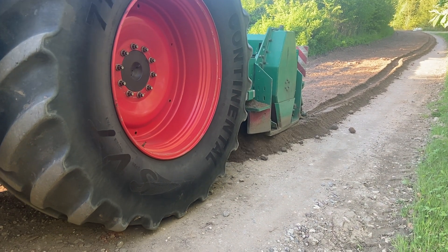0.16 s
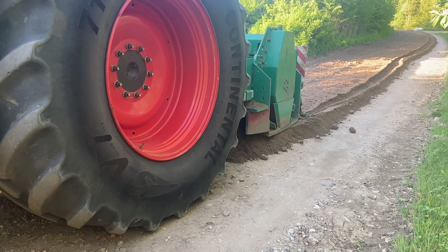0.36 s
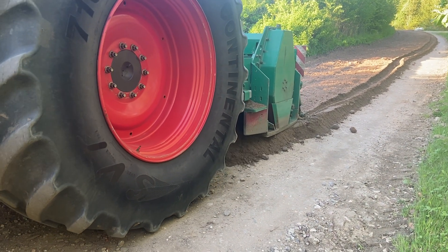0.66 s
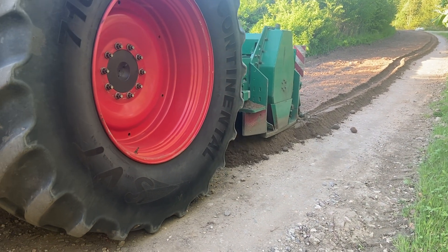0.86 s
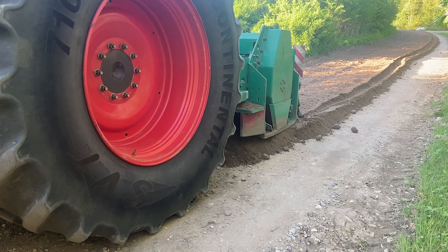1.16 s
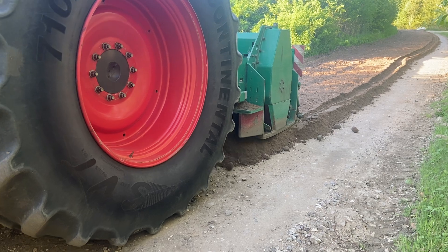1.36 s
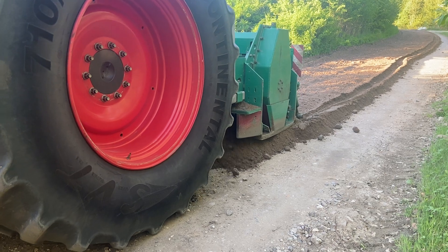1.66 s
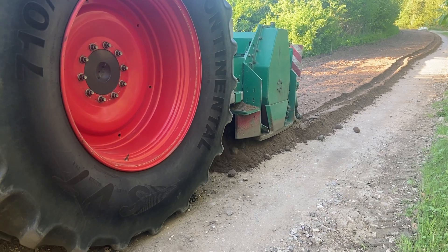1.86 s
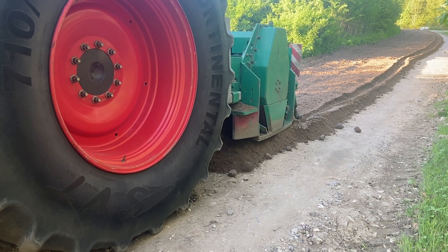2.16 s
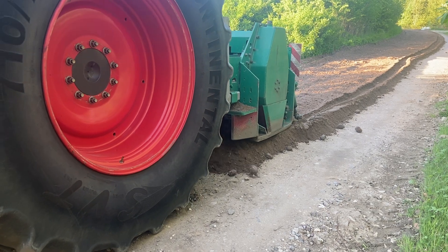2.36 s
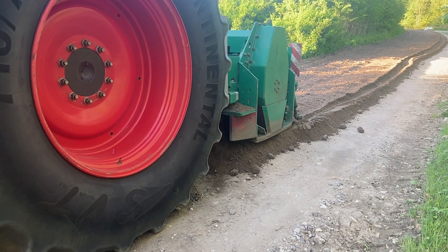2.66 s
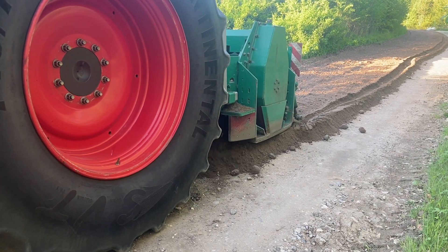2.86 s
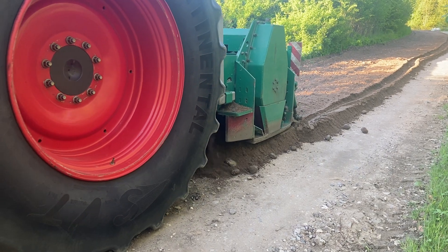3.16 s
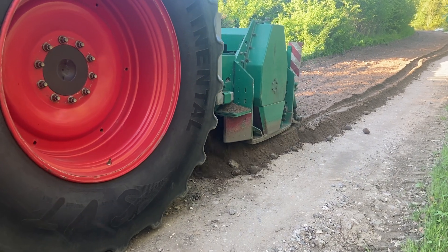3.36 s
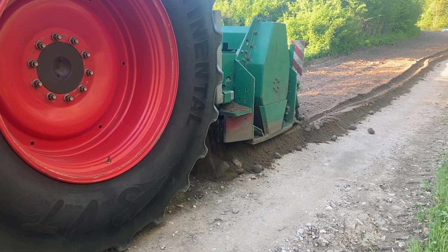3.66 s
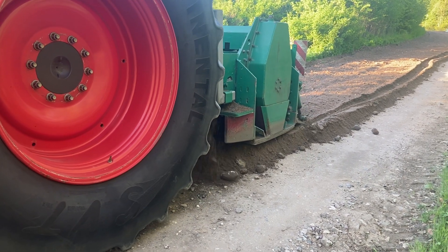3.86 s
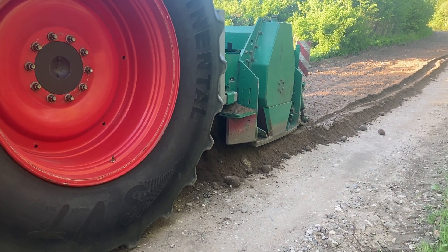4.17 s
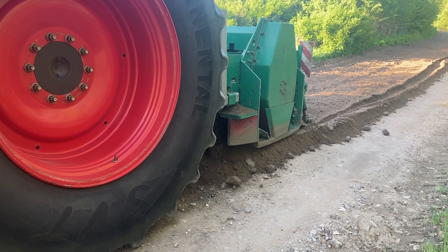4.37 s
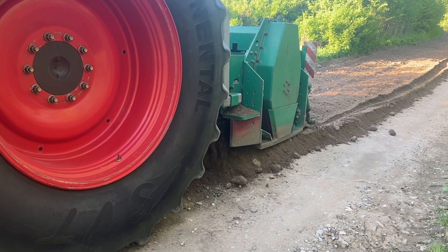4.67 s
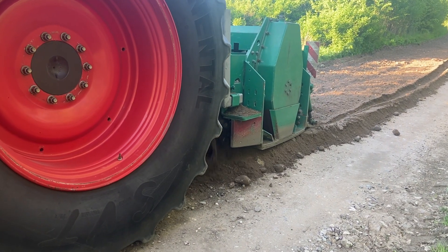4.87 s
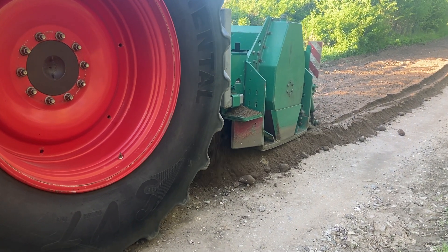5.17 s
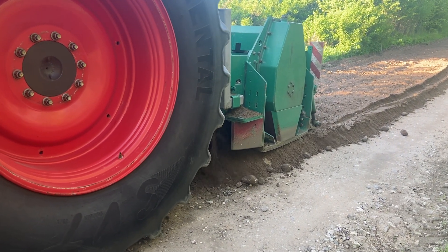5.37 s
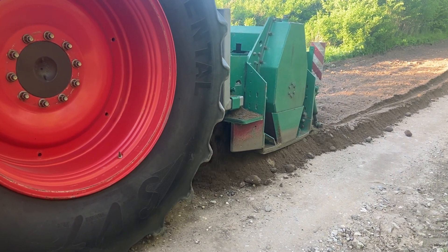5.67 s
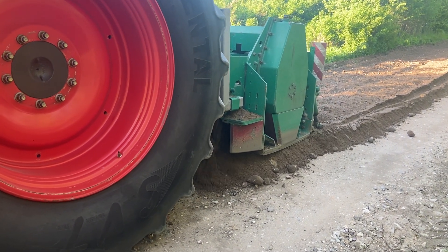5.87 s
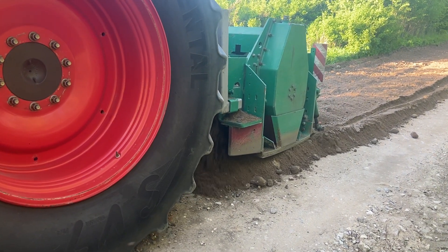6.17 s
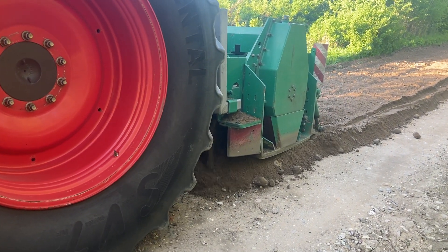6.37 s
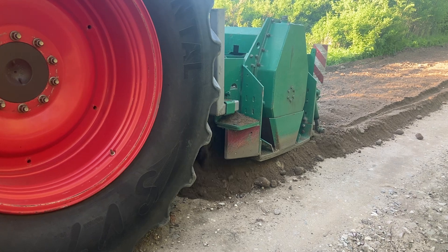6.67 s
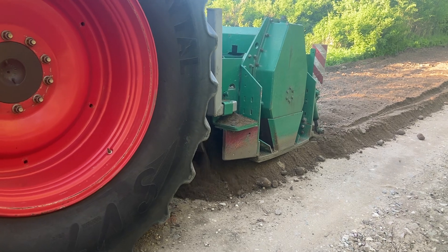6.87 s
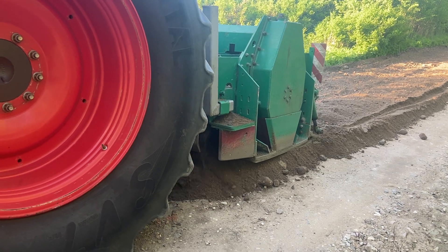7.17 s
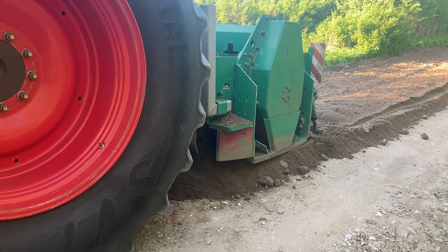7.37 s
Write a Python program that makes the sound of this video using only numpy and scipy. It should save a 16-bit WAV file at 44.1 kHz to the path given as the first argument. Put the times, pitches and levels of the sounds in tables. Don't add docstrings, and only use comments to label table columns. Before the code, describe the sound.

Continuous gritty roar of a rotor crushing gravel, throbbing slightly with a loaded diesel engine. Steady mid-pitched gear whines and faint high whistles sit within it. Stones knock and crack on steel panels at uneven intervals, some in quick pairs, and heavy rocks jolt the frame with low thuds. Light wind rumbles on the microphone, close by in the open air, and the machine never stops.

```python
import sys
import numpy as np
from scipy import signal
from scipy.fft import rfft, irfft, next_fast_len
from scipy.io import wavfile

SR = 44100
rng = np.random.default_rng(int(sys.argv[2]) if len(sys.argv) > 2 else 0)


def to_linear_factor(level_db):
    exponent = np.asarray(level_db, float) / 20
    return 10 ** exponent


def unload_audio(sound):
    columns = np.transpose(np.atleast_2d(sound))
    steps = np.round(np.clip(columns, -1, 1) * 32767)
    wavfile.write(sys.argv[1], SR, steps.astype(np.int16))


N = 331191
TIME_S = np.arange(N) / SR


def rms_one(x):
    return x / np.sqrt(np.mean(x ** 2) + 1e-20)


def in_time(rows):
    s, *columns = np.transpose(rows)
    return [np.interp(TIME_S, s, column) for column in columns]


def drift(rate_hz):
    r = np.exp(-80 * np.pi * rate_hz / SR)
    white = rng.standard_normal(N // 40 + 2002)
    slow = signal.lfilter([1], [1, -2 * r, r * r], white)[2000:]
    return np.interp(np.arange(N) / 40, np.arange(len(slow)), rms_one(slow))


def band(x, low_hz, high_hz):
    return signal.sosfilt(signal.butter(2, [low_hz, high_hz], "band", fs=SR, output="sos"), x)


def whine(hz, db, width_hz, flutter_db, per_s=14):
    turns = np.cumsum(hz + width_hz * drift(9.57)) / SR + rng.random()
    level = np.sqrt(2) * to_linear_factor(db + flutter_db * drift(per_s))
    return level * np.sin(2 * np.pi * turns)


# peak time in seconds, level in dB.
GUSTS = [(.02, -22), (.54, -32), (1.63, -39), (2.2, -37), (2.61, -33), (3.01, -35), (3.2, -24), (3.47, -29),
         (3.8, -34), (4.16, -23), (4.37, -20), (4.64, -23), (4.81, -28), (5.04, -27), (5.54, -22),
         (5.96, -25), (6.42, -31), (6.61, -34), (6.88, -35), (7.45, -32)]


def wind():
    rise_db_per_s, fall_db_per_s, lull_db = 110, 170, -44
    db = np.full(N, float(lull_db))
    for s, top_db in GUSTS:
        below_db = np.where(TIME_S < s, rise_db_per_s * (s - TIME_S), fall_db_per_s * (TIME_S - s))
        db = np.maximum(db, top_db - below_db)
    rumble = band(band(rng.standard_normal((2, N)), 41, 64), 32, 74)
    return to_linear_factor(db - 3.0) * rms_one(rumble)


# start in seconds, level in dB.
JOLTS = [
    (1.7, -20),
    (2.15, -29),
    (2.95, -27),
    (4.13, -21.5),
    (4.279, -22),
    (4.54, -26),
    (5.6, -24),
    (6.78, -33),
]


def jolts():
    rise_s, t60_s = 0.025, 0.61
    rows = np.array(JOLTS)
    since = np.maximum(TIME_S - rows[:, :1], 0)
    shape = to_linear_factor(rows[:, 1:] - 60 * since / t60_s) * (1 - np.exp(-since / rise_s))
    return 2 * shape.sum(axis=0) * rms_one(band(rng.standard_normal((2, N)), 60, 215))


# pitch in Hz, level in dB.
STEADY_WHINES = [(107, -36), (121.6, -34), (228.6, -45), (322.3, -44), (809, -35.5), (852, -40.5),
                 (931, -42), (2834, -49.5)]
# pitch in Hz, level in dB, start in seconds, end in seconds.
PASSING_WHINES = [(202.2, -37.5, 0.5, 6.46), (257.3, -31, -1, 2.47), (424, -30.5, 3.5, 8),
                  (514.4, -33, 1.9, 7), (1049, -32.5, 1, 2.8), (1223, -38, 6, 8), (1950, -48, 6.5, 8),
                  (2192, -37, 4.6, 6.1)]


def shafts():
    fade_s = 0.3
    always = [(hz, db, -1, 9) for hz, db in STEADY_WHINES]
    out = np.zeros(N)
    for hz, db, start, end in always + PASSING_WHINES:
        fade_in = np.clip((TIME_S - start + fade_s) / fade_s, 0, 1)
        fade_out = np.clip((end - TIME_S) / fade_s, 0, 1)
        wobble_hz = 1.49 + 0.00202 * hz
        out += fade_in * fade_out * whine(hz, db + 1.5 * drift(1.5), wobble_hz, flutter_db=3.0)
    return out


# time in seconds, pitch of meshing gear teeth in Hz,
# strain on the gears in dB, closeness of the crusher in dB.
DRIVE = [(0, 282.8, 0, 2), (1, 282.2, 2, -1.5), (1.6, 283, -5, -1.5), (2.1, 285.3, -2.5, -1),
         (3, 284, -2.5, 1), (3.9, 282.7, -2, -2), (4.3, 281.1, 1, -1), (4.8, 279.8, 6, 2.5),
         (5.3, 281, 3.5, -0.5), (5.8, 282.2, 1, 3.5), (6.2, 283.4, 0, 6), (6.7, 283.3, 2.5, 3.5),
         (7.51, 281.7, 4, 6.5)]
# level in dB, share of the strain (a factor), share of the closeness (a factor).
TONES = [
    (-30, -0.54, 1.3),
    (-32.5, 0.76, 0.98),
    (-34.5, 1.2, 0.04),
    (-32.5, .4, -.4),
    (-29, 0.12, .6),
    (-33, .4, 0.75),
]
# time in seconds, pitch in Hz, level in dB.
TURBO = [(.15, 8150, -47), (1.2, 8000, -43), (1.5, 8000, -50), (1.7, 7970, -43), (2.1, 8050, -47),
         (2.5, 8000, -40), (3, 7840, -42), (3.35, 7850, -43), (3.65, 7760, -44), (4.2, 7640, -49),
         (4.7, 7850, -54), (5.2, 7920, -37.5), (5.75, 7980, -48), (6.1, 7920, -44), (6.4, 7826, -46),
         (6.6, 7800, -54), (7.51, 7830, -50)]
FIRING_RATIO, PUMP_RATIO = .2858, .4936


def drivetrain():
    mesh_hz, strain, close = in_time(DRIVE)
    *mesh_dbs, firing_db, pump_db = [db + a * strain + b * close for db, a, b in TONES]
    out = np.zeros(N)
    for k, db in zip((1, 2, 4, 6), mesh_dbs):
        out += whine(k * mesh_hz, db, .4 * k, flutter_db=3.0, per_s=16)
    out += whine(FIRING_RATIO * mesh_hz, firing_db, .8, flutter_db=1.5)
    out += whine(PUMP_RATIO * mesh_hz, pump_db, 1.2, flutter_db=2.2)
    injector_hz = 7289 * mesh_hz / np.mean(mesh_hz)
    out += whine(injector_hz, -52 + 2.5 * drift(1.5), 6.0, flutter_db=3.0, per_s=25)
    turbo_hz, turbo_db = in_time(TURBO)
    return out + whine(turbo_hz, turbo_db, 5.2, flutter_db=3.0, per_s=23)


# time in seconds, bite in dB.
GRIND = [(0, 0.5), (1, 0.5), (1.9, -0.5), (2.17, 2), (2.4, 0), (3.3, 0), (3.75, 1), (4.04, -1), (4.2, 1),
         (4.9, 1), (5.4, -1), (5.61, 1), (5.94, -1), (6.5, 1), (6.8, 1.5), (6.92, -1), (7.34, 0), (7.51, 4)]
GRIND_HZ = [100, 420, 1500, 5000]
BITE_SHARES = [0.33, 1.34, 1.04, 0.18]
TREND_DB_PER_S = [-0.38, 0.22, -0.008, -0.34]
# pitch in Hz, level in dB per Hz.
ROAR = [(25, -34), (45, -15.5), (65, -4.5), (110, -5.5), (229, -5.5), (367, -7.5), (523, -4.5),
        (632, -11.5), (1110, -9), (1480, -12.5), (1900, -15), (3220, -26), (6300, -30.5), (15500, -39.5)]
# pitch in Hz, width in Hz, boost or dip in dB.
HOOD = [(500, 34, 3), (369, 18, -5.5), (1230, 86, -2), (1380, 37, -1), (1494, 120, -3.5), (1890, 73, 2.5),
        (2375, 200, 4.5), (4660, 550, 2.5), (8000, 580, 2)]
# pitch in Hz, width in Hz, boost in dB.
WHISTLES = [(2850, 50, 5), (3940, 80, 6), (7030, 60, 4), (8320, 60, 7), (8590, 60, 7), (8850, 50, 7),
            (9370, 60, 4), (10307, 70, 7), (12467, 70, 6)]


def gravel_noise(grains_per_s=2500, spread_db=3.0, grain_db=-6):
    shape = (2, 2, N)
    size_db = spread_db * np.minimum(rng.exponential(1, shape), 5)
    chips = (rng.random(shape) < grains_per_s / SR) * to_linear_factor(size_db)
    white = rng.standard_normal(shape)
    return white + to_linear_factor(grain_db) * rms_one(chips * np.sign(white))


def resonate(x, hz, width_hz, db):
    r = np.exp(-np.pi * width_hz / SR)
    top = [(1 - r * r) / 2, 0, (r * r - 1) / 2]
    bottom = [1, -2 * r * np.cos(2 * np.pi * hz / SR), r * r]
    return x + (to_linear_factor(db) - 1) * signal.lfilter(top, bottom, x)


def grinding():
    noise = gravel_noise()
    bite = in_time(GRIND)[0]
    from_middle_s = TIME_S - N / 2 / SR
    load = np.outer(BITE_SHARES, bite) + np.outer(TREND_DB_PER_S, from_middle_s)
    load[0] += 1 * drift(2.6)
    feed = .7 * drift(7) + .7 * drift(20)
    firing_hz = FIRING_RATIO * in_time(DRIVE)[0]
    throb = np.sin(np.pi * np.cumsum(firing_hz) / SR)
    roar_hz, roar_db = np.transpose(ROAR)
    edges = 22 * 2 ** np.arange(0, 9.7, 1 / 3)
    out = 0
    for k, (low, high) in enumerate(zip(edges, edges[1:])):
        pitch = np.log(np.sqrt(low * high))
        share = [np.interp(pitch, np.log(GRIND_HZ), row) for row in np.eye(len(GRIND_HZ))]
        swing = np.interp(pitch, np.log([150, 600, 3000, 9000]), [0.24, 0.92, 0.73, 0.27])
        db = np.interp(pitch, np.log(roar_hz), roar_db) + share @ load
        db = db + swing * (1.1 * feed + .5 * throb)
        db = db + 1.16 * drift(11.7) + 1.24 * drift(3.4)
        out = out + to_linear_factor(db) * band(noise[k % 2], low, high)
    for hz, width_hz, db in HOOD + WHISTLES:
        out = resonate(out, hz, width_hz, db)
    return to_linear_factor(-18.5) * rms_one(out)


# start in seconds, crunch in dB, ring pitch in Hz,
# ring level in dB, splinter level in dB.
STONES = [(.285, -17.5, 720, -24, -40), (0.328, -15, 1120, -15, -38), (.52, -16, 800, -15.5, -38),
          (.692, -9.5, 693, -10.5, -30), (.735, -20, 526, -15.5, -40), (1.38, -18, 492, -26, -34),
          (1.895, -14.5, 1680, -27, -31), (2.486, -4.5, 1630, -6, -21), (2.506, -12, 1064, -14, -27),
          (3.055, -16, 550, -20, -33), (3.083, -22, 498, -5.5, -38), (3.35, -18, 687, -15, -38),
          (3.663, -9, 1630, -16, -31), (3.719, -16, 553, -9, -38), (4.108, -8, 477, -8.5, -30),
          (4.797, -10.5, 1700, -12, -31), (5.13, -15, 537, -24, -40), (5.609, -28, 1110, -21, -38),
          (6.233, -13.5, 620, -16, -35), (6.272, -11, 486, -12, -32), (6.56, -19, 500, -11, -40),
          (6.578, -14.5, 3350, -20, -37), (6.785, -22, 1132, -14, -31), (7.46, -11.5, 2200, -22, -33)]
# start in seconds, splinter level in dB, ring pitch in Hz,
# ring level in dB.
CHIPS = [
    (3.94, -40, 3980, -34),
    (4.205, -34, 3980, -21),
    (4.699, -42, 4747, -24),
    (5.329, -25, 5500, -30),
    (5.549, -23.5, 6500, -32),
    (6.158, -32, 5900, -24),
    (6.885, -40, 5300, -22),
    (7.259, -36, 6500, -38),
]


def stones():
    hold_s = 0.011
    blows = [(*stone, 0.17) for stone in STONES]
    blows += [(s, -26, hz, ring_db, db, .1) for s, db, hz, ring_db in CHIPS]
    t = np.arange(SR // 4) / SR
    out = np.zeros((2, N + SR))
    for s, crunch_db, hz, ring_db, splinter_db, t60_s in blows:
        white = rng.standard_normal((2, len(t)))
        crunch = to_linear_factor(crunch_db - 7.0) * rms_one(band(white, 400, 2600))
        splinters = to_linear_factor(splinter_db - 4.0) * rms_one(band(white, 2500, 8000))
        fall = to_linear_factor(-60 * np.maximum(t - hold_s, 0) / t60_s)
        burst = (1 - np.exp(-t / 0.004)) * fall * (crunch + splinters)
        clean = min(1, 900 / hz) * np.sin(2 * np.pi * hz * t)
        rough = .8 * rms_one(band(white, .82 * hz, 1.2 * hz))
        swell = 1 - np.exp(-t * hz / 3)
        ring = to_linear_factor(ring_db - 3) * (clean + rough) * swell * to_linear_factor(-60 * t / (.06 + 50 / hz))
        at = round(s * SR)
        out[:, at:at + len(t)] += burst + ring
    return out[:, :N]


# pitch in Hz, left-right likeness from 0 to 1,
# lead of the right in radians, left minus right in dB.
PORTS = [(0, 0.93, 0, 0), (550, 0.8, 0.6, 1), (764, 0.24, -0.74, 3), (1530, 0.35, -1.5, -3),
         (1795, 0.52, 2, -2), (2620, 1, -1.5, -2.5), (3280, 0.13, -1, 5.5), (3720, 0.59, -0.6, -0.5),
         (4650, 1, 1.5, 3), (5530, 0.037, 0, -1.5), (6800, 0.44, 0, -1), (7250, 0.87, 0.05, 2),
         (8580, 1, 2.5, 0), (15600, 1, 13, 0)]


def ports(first, second, tones):
    size = next_fast_len(N + 4096)
    hz = np.arange(size // 2 + 1) * SR / size
    port_hz, *columns = np.transpose(PORTS)
    alike, lead, tilt_db = [np.interp(hz, port_hz, column) for column in columns]
    alike = np.clip(alike, 0, 1)
    turn = np.exp(.5j * lead) / to_linear_factor(tilt_db / 2)
    a, b, tone = rfft(np.array([first, second, tones]), size)
    left = (a + tone) / turn
    right = (alike * a + np.sqrt(1 - alike ** 2) * b + tone) * turn
    heard = hz < 15730
    return irfft(np.array([left, right]) * heard, size)[:, :N]


def scene():
    first, second = wind() + jolts() + grinding() + stones()
    return ports(first + shafts(), second, drivetrain())


def roll_off(x):
    return signal.sosfilt(signal.butter(12, 15880, fs=SR, output="sos"), x)


def record(dry):
    mix = 1.296 * np.tanh(dry / 1.302)
    return roll_off(mix)


dry = scene()
out = record(dry)
unload_audio(out)
```